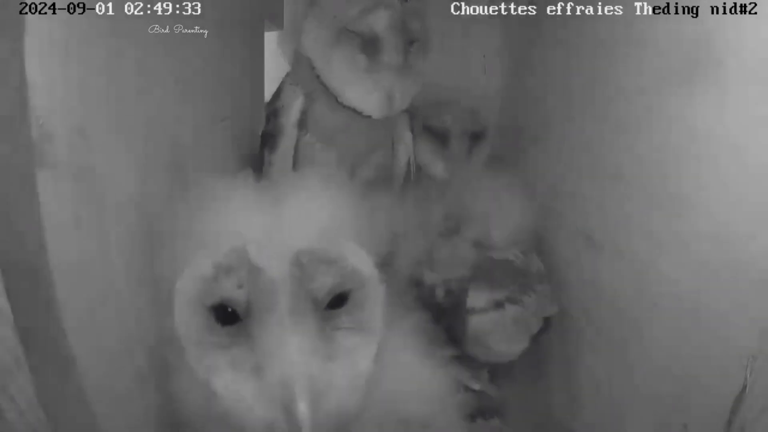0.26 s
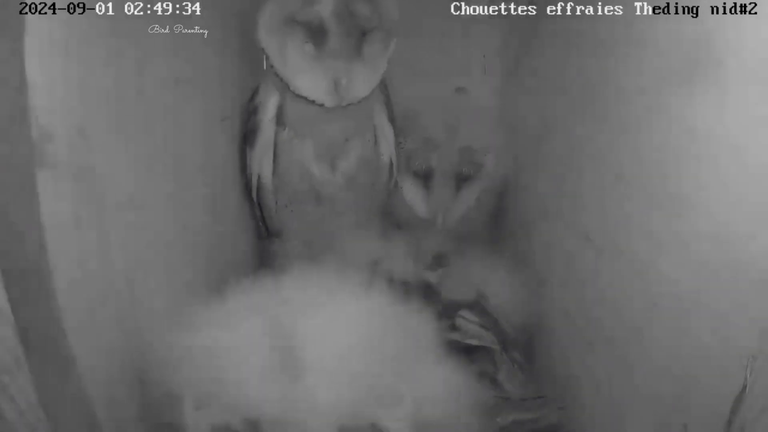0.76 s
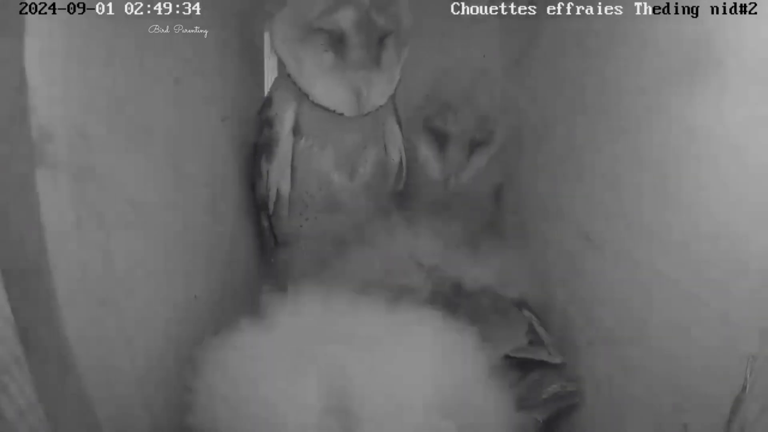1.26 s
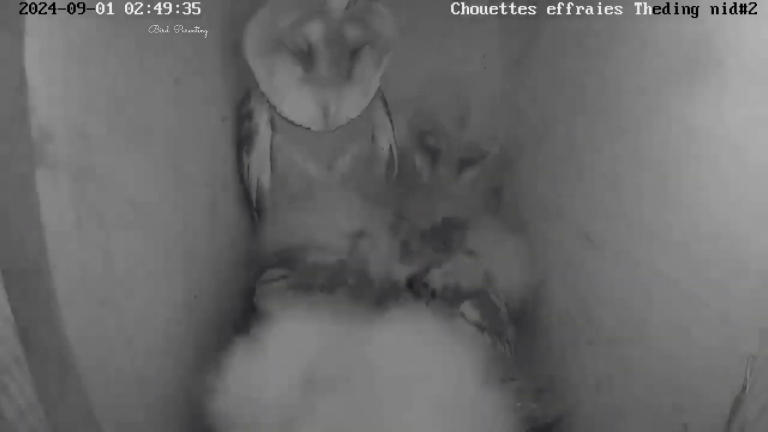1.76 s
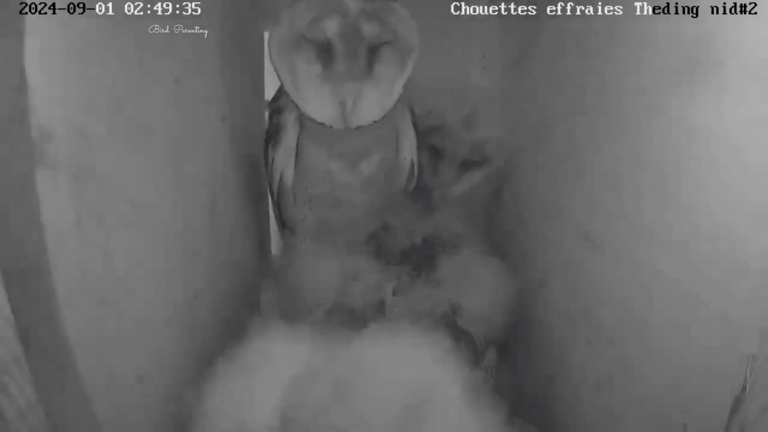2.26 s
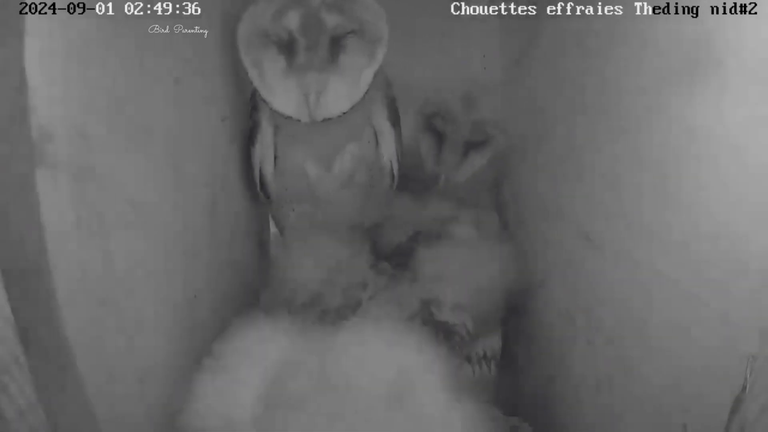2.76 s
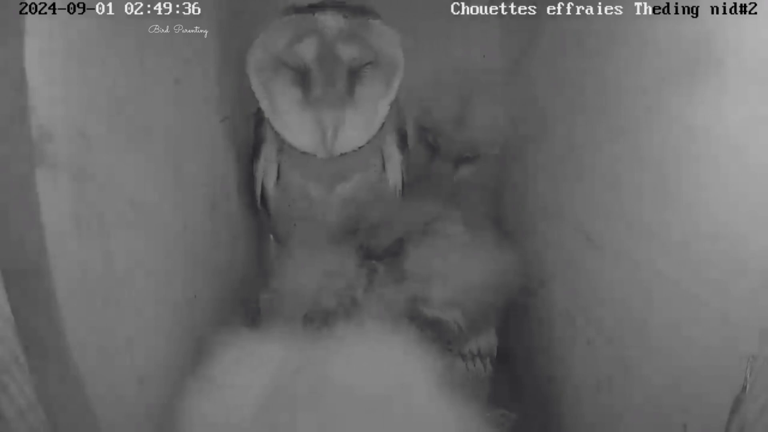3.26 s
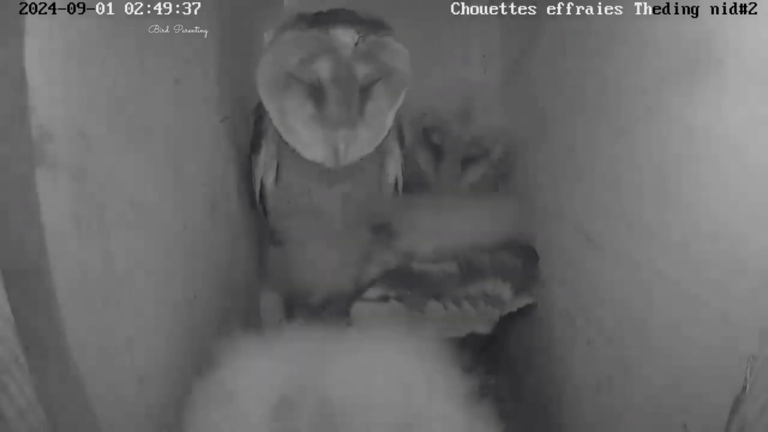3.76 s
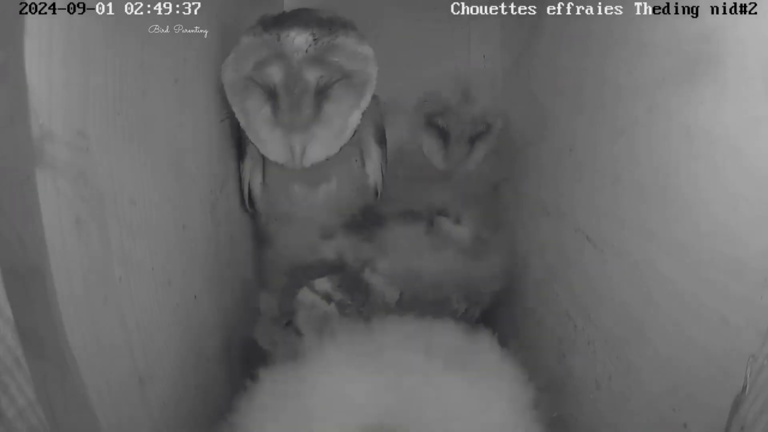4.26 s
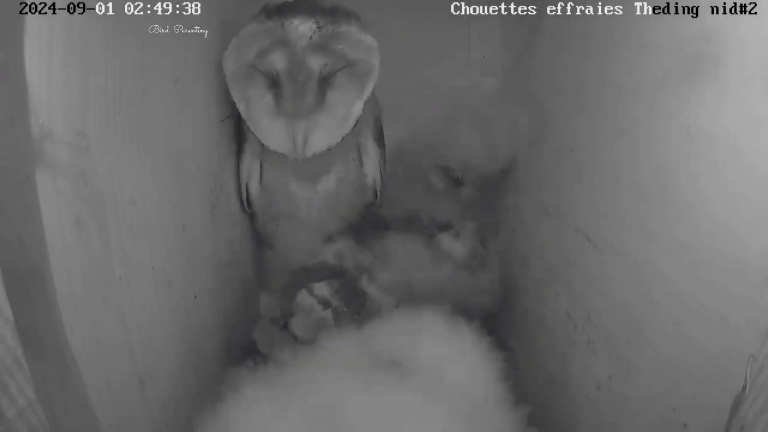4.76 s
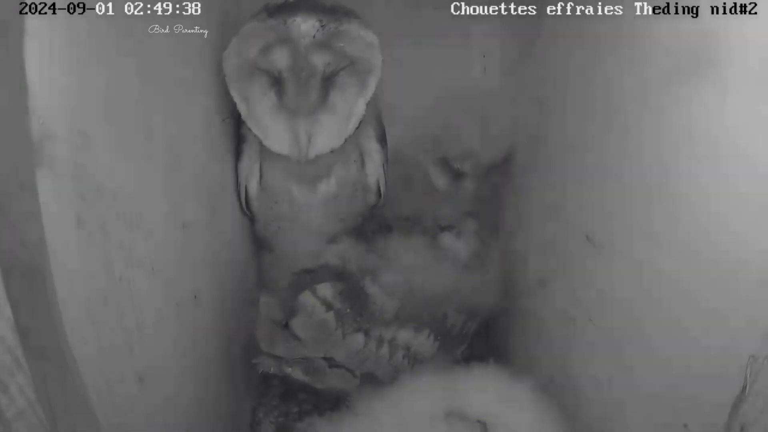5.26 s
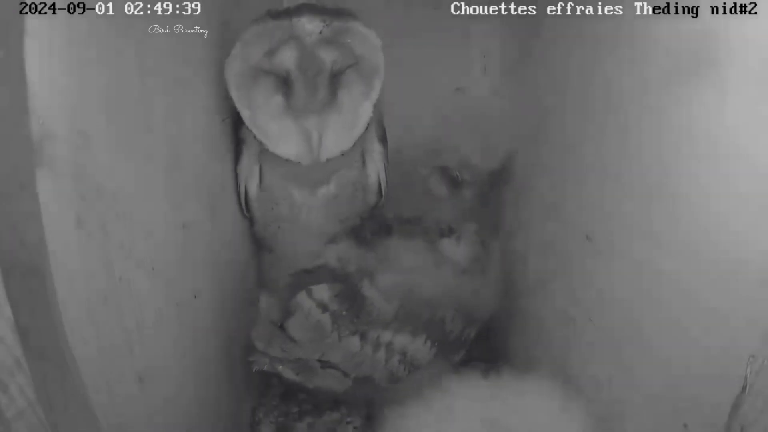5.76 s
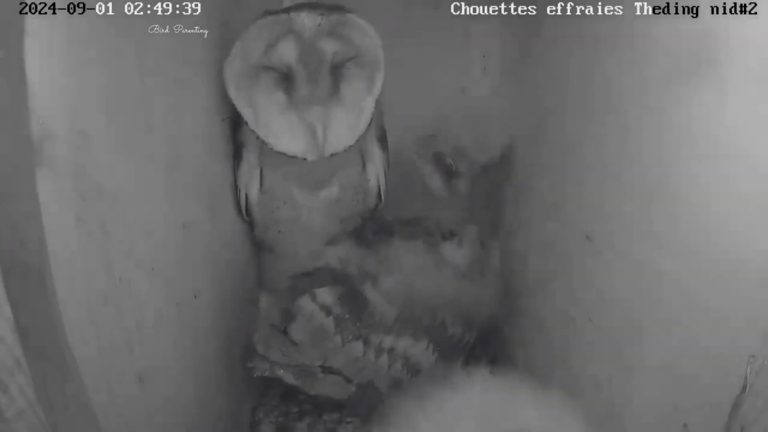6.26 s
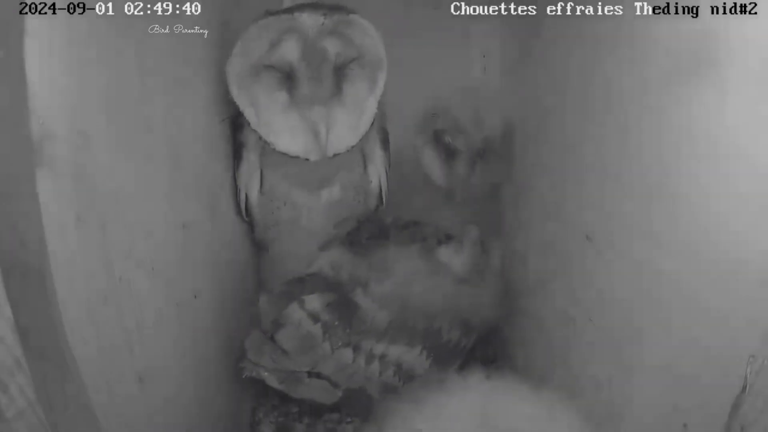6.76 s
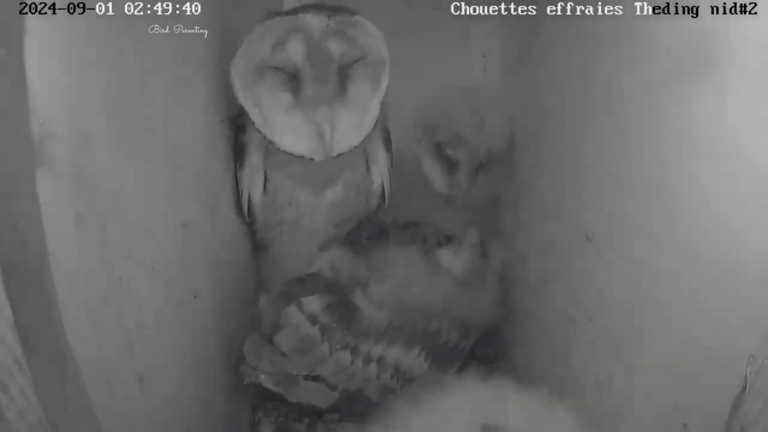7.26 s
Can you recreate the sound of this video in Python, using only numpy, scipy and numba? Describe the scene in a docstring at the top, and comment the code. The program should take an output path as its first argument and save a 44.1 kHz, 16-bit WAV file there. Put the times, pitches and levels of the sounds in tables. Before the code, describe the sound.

A close, narrow-band sound inside a wooden owl nest box at night. It opens with shuffling: small scrapes and a cluster of dull foot thumps on boards, strongest around 0.2 s. From 0.5 to 1.25 s the near owlet gives a loud, harsh, snore-like hiss, swelling fast and cutting off as the beak closes. A heavy hollow knock and light scratches follow at 1.4 s. A softer, thinner hiss from the farther owlet runs 1.6-2.3 s. The near one returns at 2.5-3.2, 4.15-4.9 and 6.2-6.95 s, the far one at 3.3-3.9 and 5.35-6.0 s. Footfalls and low rocking recur around 3.1 and 3.9 s; sharp clicks of claw or beak land near 3.97, 4.9 and 6.0 s. The walls ring briefly. Faint steady hiss drops back in the gaps, and the end is nearly quiet, with slight low movement.

```python
"""Two barn owlets beg in turn inside a wooden nest box, one close to the microphone, one further back.
Each call is turbulent air in throat resonances that rise as the beak opens and fall as it shuts.
Between calls the birds shuffle: claws scrape, a beak snaps, feet thump the boards and the box rocks.
The box rings around them, over a faint steady hiss; the recorder keeps a narrow, gated band."""
import sys
import numpy as np
from scipy import signal
from scipy.io import wavfile
from scipy.ndimage import uniform_filter1d, minimum_filter1d
from numba import njit

SR = 44100
rng = np.random.default_rng(int(sys.argv[2]) if len(sys.argv) > 2 else 0)


def to_wav(s):
    """Save 16-bit WAV."""
    ch = np.atleast_2d(s).T  # columns
    pcm = np.round(np.clip(ch, -1, 1) * 32767)  # PCM
    wavfile.write(sys.argv[1], SR, pcm.astype(np.int16))


N = 331191
T = np.arange(N) / SR


def undb(db):
    """Decibels to gain."""
    return 10 ** (np.asarray(db) / 20)


def unit(x):
    """Scale to rms 1."""
    return x / np.sqrt(np.mean(x ** 2))


def add(out, start_s, x):
    """Mix x in at a time in seconds."""
    i = max(int(start_s * SR), 0)
    out[i:i + len(x)] += x[:N - i]


@njit
def moving_bandpass(x, hz, width):
    """State-variable band-pass with a moving centre, gain 1 there."""
    y, band_state, low_state = np.empty(len(x)), 0., 0.
    for i in range(len(x)):
        g, damping = np.tan(np.pi * hz[i] / SR), width / hz[i]
        v = (band_state + g * (x[i] + 1e-18 - low_state)) / (1 + g * (g + damping))
        band_state = 2 * v - band_state
        low_state = low_state + 2 * g * v
        y[i] = damping * v
    return y


def band(x, hz, width):
    """One resonance, fixed or moving."""
    return moving_bandpass(x, hz * np.ones(len(x)), float(width))


def air(size, hz, width):
    """Turbulence passed twice through a resonance, which gives it steep skirts."""
    return band(band(rng.standard_normal(size), hz, width), hz, width)


def rush(size, resonances, stretch=1):
    """Turbulence in a set of resonances that move together; rms 1."""
    return unit(sum(undb(db) * air(size, hz * stretch, width) for hz, width, db in resonances))


# Resonances of throat and surroundings for each pose of the head, near owlet then far owlet.
# Each row: frequency with the beak open in Hz, width of each filter pass in Hz, relative gain in dB.
NEAR_BOWED = [(400, 280, -25.5), (777, 370, -24), (1142, 220, -20), (1540, 280, -18), (2266, 210, -5),
              (2587, 400, -2.5), (3048, 240, -2.5), (3797, 340, -2.5), (4213, 190, -1), (4570, 260, -0.9),
              (5040, 620, -9.5), (6230, 660, -5.5), (6745, 450, -3.5), (7440, 200, -13)]
NEAR_LOW = [(434, 283, -20.5), (744, 180, -17.5), (1130, 460, -23.5), (1540, 180, -15), (2335, 670, -9.5),
            (2680, 160, -3.2), (3083, 620, -4.5), (3520, 290, -7), (3870, 500, -7.5), (4427, 500, -4),
            (5500, 1200, -8.5), (6370, 370, -14), (6660, 1600, -12.5), (7370, 450, -22.5)]
NEAR_TURNED = [(463, 310, -25.5), (747, 150, -22), (1400, 810, -28), (1630, 150, -18.5), (2104, 200, -5),
               (2370, 240, -3.1), (2625, 210, -7.5), (2900, 140, -5), (3460, 160, -6.5), (3853, 240, -3.5),
               (4260, 1300, -3), (5760, 580, -6.5), (6080, 170, -6.5), (6820, 380, -4), (7400, 590, -9.5)]
NEAR_CROUCHED = [(460, 280, -20.5), (767, 180, -19), (1330, 610, -29.5), (1560, 110, -24), (2128, 260, -4),
                 (2380, 280, 0.5), (2770, 530, 0.5), (3140, 830, -5.5), (3690, 340, -5.5), (4210, 470, -1),
                 (4740, 370, -6.5), (5380, 400, -7.5), (6380, 960, -11.5), (7360, 230, -11.1)]
FAR_RAISED = [(400, 340, -27.5), (1022, 190, -20), (1412, 170, -18), (2128, 500, -15), (2670, 360, -10),
              (3450, 490, -5.6), (4416, 1500, -10.5), (4765, 340, -19), (5280, 250, -12), (6075, 540, -6.5),
              (6474, 610, -0.5), (7335, 260, -9.5)]
FAR_TUCKED = [(401, 270, -16.5), (990, 170, -10.5), (1414, 240, -12), (1870, 150, -9.5), (2170, 130, -5.5),
              (2630, 560, -7), (3384, 620, -4), (4380, 340, -4.5), (5040, 1200, -9.5), (6040, 460, -6.5),
              (6280, 900, -5.5), (6880, 160, -5.5), (7350, 400, -14)]
# The begging calls, near and far by turns. Each row: owlet, pose of the head, effort, beak.
# Effort: hiss level in dB, its swell in dB, swell time constant in s, release in s,
# low airflow level in dB, its swell in dB, brightness in dB.
# Beak: opens at s, shuts at s, opening tone in Hz and dB, closing tone in Hz and dB,
# mouth resonance from Hz, to Hz.
CALLS = [ ("near", NEAR_BOWED, (-13.1, 23, .102, .085, -30.8, 9.5, -7),
         (.483, 1.252, 970, -31, 930, -33.5, 3990, 4750)),
         ("far", FAR_RAISED, (-26, 43, .098, .13, -49.3, 17, -2.4),
         (1.577, 2.311, 1400, -57, 1340, -52.5, 3300, 3550)),
         ("near", NEAR_LOW, (-14.6, 23.5, .108, .1, -32.8, 7.5, -8.1),
         (2.464, 3.193, 700, -33.5, 1150, -43, 4450, 4350)),
         ("far", FAR_RAISED, (-24.3, 46, .093, .132, -47.2, 17, -2.3),
         (3.321, 3.922, 926, -54, 1330, -47, 3340, 3550)),
         ("near", NEAR_TURNED, (-11.1, 22.5, .078, .11, -31.2, 8, -9.8),
         (4.155, 4.901, 750, -35, 1944, -41, 4730, 3750)),
         ("far", FAR_TUCKED, (-29.1, 34, .115, .102, -46.5, 10, -5),
         (5.356, 5.995, 912, -49.5, 1484, -46, 3320, 3400)),
         ("near", NEAR_CROUCHED, (-11.2, 20.5, .105, .11, -33.8, 8, -10.3),
         (6.208, 6.95, 796, -28.5, 945, -45, 4760, 3900))]


def begging():
    """Both owlets call by turns, each call with its own pose, push of air and beak movement."""
    out = np.zeros(N)
    for owlet, pose, effort, beak in CALLS:
        add(out, beak[0], call(owlet, pose, effort, beak))
    return out


# Manner of the near and the far owlet. Each row: attack in s, airflow swell time constant in s,
# extra brightness at the start in dB, mouth resonance in dB, wheeze over the opening tone in dB.
OWLETS = {"near": (.0045, .33, 4, 2.8, -18), "far": (.011, .085, 1, 4, 0)}
# The mouth resonance grows out of a dip
MOUTH_GROWTH_S, MOUTH_DIP_DB = .15, 7


def call(owlet, pose, effort, beak, open_s=.012, shut_s=0.037, sag=.1, mouth_width_hz=450,
         flutter=.05, flutter_hz=170, ring_s=.027):
    """One rasping hiss: the air starts abruptly, swells with effort and is cut as the beak shuts."""
    start, end, open_hz, open_db, shut_hz, shut_db, first_hz, last_hz = beak
    t = np.arange(start, end, 1 / SR)
    size, since, left = len(t), t - start, end - t
    attack_s, flow_swell_s, start_bright_db, mouth_db, wheeze_db = OWLETS[owlet]
    hiss_db, flow_db, bright_db = push_of_air(effort, since, left, flow_swell_s, start_bright_db)
    # a half-shut beak lowers every upper resonance
    stretch = 1 - sag * (np.exp(-since / open_s) + np.exp(-left / shut_s))
    low = rush(size, [r for r in pose if r[0] < 1750])
    middle = rush(size, [r for r in pose if 1750 <= r[0] < 5300], stretch)
    high = rush(size, [r for r in pose if r[0] >= 5300], stretch)
    # the main mouth resonance grows and slides through the call
    mouth = undb(mouth_db - MOUTH_DIP_DB * np.exp(-since / MOUTH_GROWTH_S))
    mouth_hz = np.linspace(first_hz, last_hz, size)
    middle = unit(middle + (mouth - 1) * band(middle, mouth_hz, mouth_width_hz))
    high_share = np.clip(undb(bright_db), 0, .95)
    hiss = unit(reflections(np.sqrt(1 - high_share ** 2) * middle + high_share * high))
    # loose membranes flutter in the jet
    hiss = hiss * (1 + flutter * unit(air(size, flutter_hz, 200)))
    # the barely open mouth starts with a hollow tone
    opening = unit(air(size, open_hz, 380)) * undb(open_db) * np.exp(-since / ring_s)
    wheeze = undb(open_db + wheeze_db) * thin_wheeze(since)
    whistle = undb(shut_db) * closing(left, shut_hz)
    valve = np.clip(np.minimum(since / attack_s, left / 0.0078), 0, 1)
    return valve * (hiss * undb(hiss_db) + low * undb(flow_db) + opening + wheeze + whistle)


# As the throat opens the hiss mellows; the effort wavers a little (rms dB)
MELLOW_S, WAVER_DB, WAVER_HZ = .25, .25, 10
# The shutting beak chokes the hiss ever faster; low airflow and brightness lose a share of it
CHOKE_DB, CHOKE_POWER, FLOW_CHOKE_SHARE, BRIGHT_CHOKE_SHARE = 37, 2.5, .15, .11


def push_of_air(effort, since, left, flow_swell_s, start_bright_db):
    """Levels of hiss, low airflow and brightness: the push swells, holds, and the shutting beak chokes it."""
    hiss_db, swell_db, swell_s, release_s, flow_db, flow_swell_db, bright_db = effort
    choke_db = CHOKE_DB * np.maximum(1 - left / release_s, 0) ** CHOKE_POWER
    waver_db = WAVER_DB * unit(air(len(since), WAVER_HZ, 2 * WAVER_HZ))
    hiss_db = hiss_db - swell_db * np.exp(-since / swell_s) - choke_db + waver_db
    flow_db = flow_db - flow_swell_db * np.exp(-since / flow_swell_s)
    flow_db = flow_db - FLOW_CHOKE_SHARE * choke_db + waver_db
    bright_db = bright_db + start_bright_db * np.exp(-since / MELLOW_S) - BRIGHT_CHOKE_SHARE * choke_db
    return hiss_db, flow_db, bright_db


# Resonances of the barely parted beak.
# Each row: frequency in Hz, width of each filter pass in Hz, relative gain in dB.
WHEEZE = [(970, 160, 1), (1410, 140, 1), (2750, 400, 0), (4450, 300, -9), (6450, 650, -4)]
WHEEZE_S = .2


def thin_wheeze(since):
    """Air leaks thinly through the barely parted beak and fades as the call goes on."""
    return rush(len(since), WHEEZE) * np.exp(-(since / WHEEZE_S) ** 2)


# Resonances of the almost shut mouth. Each row: multiple of the closing tone, relative gain in dB.
SHUT_MOUTH = [(1, 0), (2.15, -6), (3.2, -8), (4.4, -7)]


def closing(left, hz, last_s=.026, fall=.4, width_hz=130):
    """In the last moments of a call the shutting mouth whistles and falls in pitch."""
    glide = 1 + fall * np.minimum(left / last_s, 2) ** 1.5
    resonances = [(hz * multiple, width_hz, db) for multiple, db in SHUT_MOUTH]
    return rush(len(left), resonances, glide) * np.exp(-(left / last_s) ** 4)


def reflections(x, wall_db=-11, longest_s=.009, count=14):
    """The close walls return a cluster of echoes that comb the hiss, differently for each call."""
    lags, sizes = rng.uniform(.001, longest_s, count), rng.standard_normal(count)
    sizes = sizes * np.exp(-lags / longest_s)
    response = np.zeros(SR // 40)
    response[0] = 1
    response[(lags * SR).astype(int)] += undb(wall_db) * sizes / np.linalg.norm(sizes)
    return signal.fftconvolve(x, response / np.linalg.norm(response))[:len(x)]


# Claws and beaks on hard surfaces inside the box.
# Each row: start in seconds, level in dB, rise time constant in s, t60 in s, centre in Hz.
SCRAPES = [(.035, -42, 0.004, 0.12, 1300), (.037, -47.5, 0.0032, 0.063, 4000), (.11, -60, .005, 0.11, 2500),
           (.192, -46, .001, 0.28, 600), (.194, -59, .002, .06, 4500), (1.361, -50, .004, 0.07, 5000),
           (1.381, -49, .002, 0.055, 5500), (3.942, -51, .003, 0.073, 4500),
           (3.974, -37, 0.0034, 0.037, 3520), (4.093, -60, 0.0016, 0.045, 3500),
           (4.911, -34, 0.00052, .085, 3500), (4.934, -53, .002, .08, 3500),
           (5.998, -34.5, 0.00072, 0.044, 3600), (7.18, -63, .01, .2, 1000), (7.44, -57, .003, .08, 1100)]
# Their colour. Each row: frequency in Hz, width of each filter pass in Hz, relative gain in dB.
SCRAPE_RING = [(800, 700, 7), (1530, 760, -1), (2500, 810, -1.5), (4100, 1800, -3.5), (6520, 1400, -9.5)]


def scrapes(grain_db=3, bandwidth=1.4):
    """Short grainy bursts of horn on wood or horn on horn."""
    out, t = np.zeros(N), T[:SR // 3]
    for start_s, db, rise, t60, hz in SCRAPES:
        grain = undb(grain_db * unit(air(len(t), 150, 400)))
        shape = (1 - np.exp(-t / rise)) * undb(-60 * t / t60)
        rasp = grain * rush(len(t), SCRAPE_RING)
        rasp = band(band(rasp, hz, bandwidth * hz), hz, bandwidth * hz)
        add(out, start_s, undb(db) * shape * unit(rasp))
    return out


# Modes of the floor boards. Each row: frequency in Hz, t60 in s, relative level in dB.
BOARDS = [(77, .3, -16.5), (205, .08, 0.5), (252, .2, -5.5), (262, .05, 6), (353, .1, -22.5),
          (443, .09, -12), (720, .08, -14.5)]
# Footfalls on the boards. Each row: start in seconds, peak level in dB, contact time in s.
STEPS = [(.002, -37.5, .006), (0.056, -35, 0.0061), (0.113, -41, .003), (0.197, -30, 0.0024),
         (0.215, -15.5, 0.0038), (.233, -25.5, 0.0028), (.255, -23, .004), (0.384, -39, 0.0064),
         (0.845, -37.5, 0.0024), (1.189, -34.5, 0.003), (1.212, -37, 0.0051), (1.389, -12, 0.0032),
         (1.917, -39.5, 0.0064), (1.938, -42, 0.0065), (2.303, -48, .003), (2.388, -54, 0.0026),
         (3.122, -29, 0.0064), (3.17, -36.5, 0.0046), (3.267, -38.5, 0.0072), (3.856, -27, .006),
         (3.969, -46, 0.0093), (4.155, -34, 0.0065), (4.189, -34, 0.0062), (4.467, -54, 0.0065),
         (4.876, -58.5, 0.0035), (6.66, -39, .004), (7.45, -70, .002)]


def footfalls(body_hz=235, body_width_hz=230):
    """Each foot pushes the boards, which drive the air in the box; a longer push favours the lowest modes."""
    out, t = np.zeros(N), T[:SR // 2]
    boards = sum(undb(db) * np.sin(2 * np.pi * hz * t) * undb(-60 * t / t60) for hz, t60, db in BOARDS)
    for start_s, db, contact in STEPS:
        push = np.sin(np.pi * np.minimum(t / contact, 1)) ** 2
        shaken = signal.fftconvolve(np.gradient(push), boards)[:len(t)]
        thump = band(shaken, body_hz, body_width_hz)
        add(out, start_s, undb(db) * thump / np.abs(thump).max())
    return out


# Shifts of weight that rock the whole box.
# Each row: start in seconds, level in dB, rocking pitch in Hz.
SHIFTS = [(0, -46, 82), (.19, -46, 82), (.3, -52, 80), (1.2, -43, 80), (1.38, -41, 76), (1.92, -46.5, 80),
          (3.13, -51, 79), (3.25, -59, 79), (3.85, -50, 78), (3.95, -47, 78), (4.19, -54, 78),
          (4.47, -57, 78), (6.01, -46.5, 68), (6.25, -51, 52), (6.43, -62, 45), (6.61, -57, 40),
          (6.75, -63, 40), (7.09, -54, 55), (7.17, -53, 48), (7.28, -68, 48)]
# Every shift loads the boards gradually, then the rocking dies away
SHIFT_RISE_S, SHIFT_T60_S = .025, .42


def shuffling(rock_width_hz=45, creak_db=-8, rustle_db=-29, full_stir_hz=82):
    """Moving bodies rock the box, stir its boards and rustle the litter."""
    out, t = np.zeros(N), T[:SR]
    decay = undb(-60 * np.maximum(t - SHIFT_RISE_S, 0) / SHIFT_T60_S)
    weight = np.minimum(t / SHIFT_RISE_S, 1) * decay
    for start_s, db, hz in SHIFTS:
        rock = unit(air(len(t), hz, rock_width_hz))
        creak = undb(creak_db) * unit(air(len(t), 190, 120))
        rustle = undb(rustle_db) * unit(air(len(t), 700, 790))
        # slow rocking hardly stirs the boards
        stir = (hz / full_stir_hz) ** 5
        add(out, start_s, undb(db) * weight * (rock + stir * (creak + rustle)))
    return out


# Standing waves of the air in the box lift and cancel narrow bands.
# Each row: frequency in Hz, width in Hz, gain in dB.
BOX_AIR = [(491.7, 38, 8), (582, 130, -11.5), (664, 140, -1.5), (1616, 90, -6.5), (1950, 21, -3.5),
           (2140, 57, -6), (2870, 90, 1), (4130, 100, -3), (5340, 200, -2.5)]


def nest_box(x, ring_db=-30, ring_t60_s=.2):
    """Standing waves colour the sound made in the box, and its walls ring briefly."""
    for hz, width, db in BOX_AIR:
        x = x + (undb(db) - 1) * band(x, hz, width)
    t = T[:SR]
    tail = rng.standard_normal(len(t)) * undb(-60 * t / ring_t60_s)
    return x + undb(ring_db) * signal.fftconvolve(x, tail / np.linalg.norm(tail))[:N]


# Colour of the steady background hiss.
# Each row: frequency in Hz, width of each filter pass in Hz, relative gain in dB.
NIGHT = [(45, 90, -17), (270, 83, -0.5), (501.6, 65, -2.5), (805, 250, -6.5), (1130, 210, -8),
         (2830, 2800, -6.5), (6000, 4500, -12)]


def night_hiss(level_db=-61):
    """Faint steady background: noise in broad overlapping bands."""
    return undb(level_db) * rush(N, NIGHT)


def scene():
    """Alternating calls and shuffling over a faint steady hiss."""
    # voices and scrapes pass through the air of the box; thumps and rocking come from its boards
    inside = nest_box(begging() + scrapes()) + footfalls() + shuffling()
    return (inside + night_hiss())[None]


def gate(x, threshold_db, depth_db, hold_s, fade_s):
    """Noise suppressor: opens at once for sound, holds, then fades the background down."""
    loud = uniform_filter1d(x ** 2, SR // 60) > undb(threshold_db) ** 2
    quiet_s = T - np.maximum.accumulate(np.where(loud, T, -np.inf))
    return x * undb(depth_db * np.clip((quiet_s - hold_s) / fade_s, 0, 1))


def limiter(x):
    """Turns the gain down for a few ms around peaks near full scale."""
    gain = np.minimum(1, .88 / (np.abs(x) + 1e-9))
    return x * uniform_filter1d(minimum_filter1d(gain, size=129), size=129)


def filtered(x, order, ripple_db, stop_db, hz):
    """Steep elliptic low-pass."""
    return signal.sosfilt(signal.ellip(order, ripple_db, stop_db, hz, fs=SR, output="sos"), x)


def below(x, hz):
    """Gentler low-pass without delay, for splitting off the lower part."""
    return signal.sosfiltfilt(signal.butter(4, hz, fs=SR, output="sos"), x)


BAND_HZ, TOP_HZ, MIRROR_HZ = 7540, 8769, 16000


def record(dry, mirror_db=-22, gate_open_db=-58):
    """The recorder passes a narrow band, gates bass and treble, limits, and mirrors its top edge upward."""
    x = filtered(dry[0], 12, .2, 80, BAND_HZ)
    bass = below(x, 1800)
    treble = gate(x - bass, gate_open_db, depth_db=-18.5, hold_s=0.044, fade_s=0.098)
    # the deepest rumble passes ungated
    rumble = below(x, 110)
    bass = rumble + gate(bass - rumble, gate_open_db, depth_db=-10.5, hold_s=.04, fade_s=0.12)
    # each frequency f gets a faint image at MIRROR_HZ - f
    mirror = undb(mirror_db) * 2 * np.cos(2 * np.pi * MIRROR_HZ * T)
    x = limiter(bass + treble) * (1 + mirror)
    return filtered(x, 12, .1, 70, TOP_HZ)[None]


dry = scene()
out = record(dry)
to_wav(out)
```